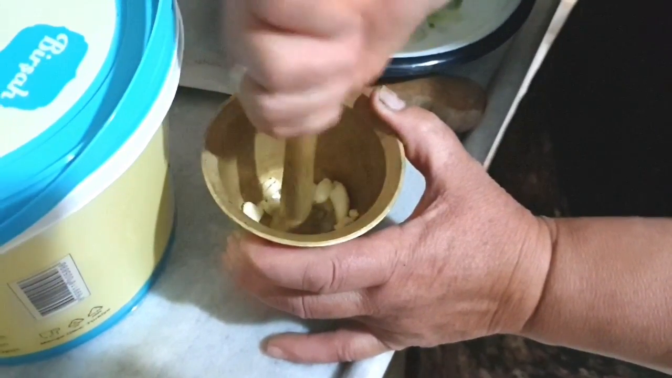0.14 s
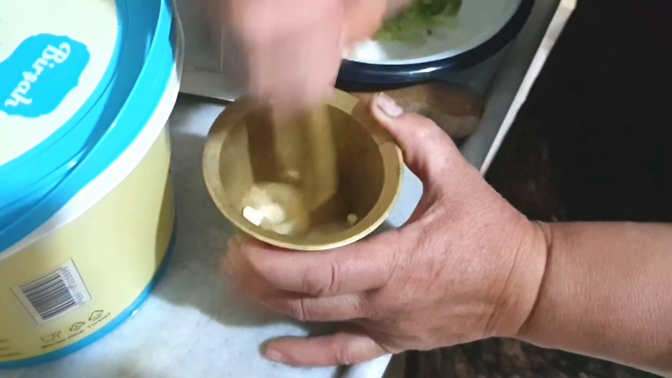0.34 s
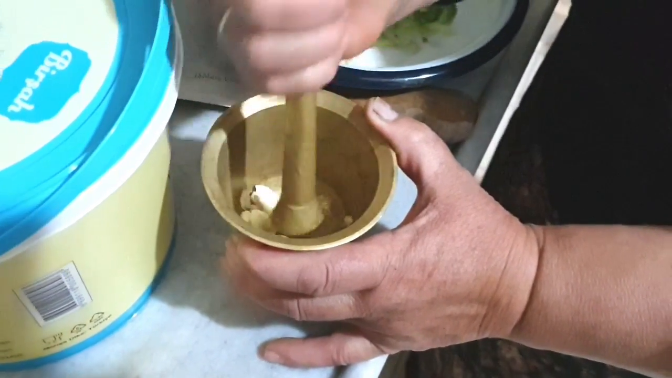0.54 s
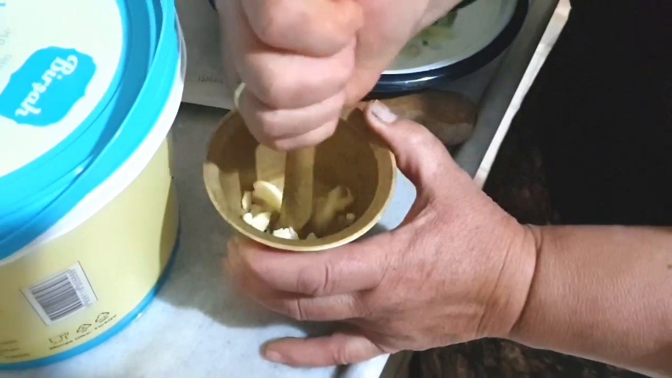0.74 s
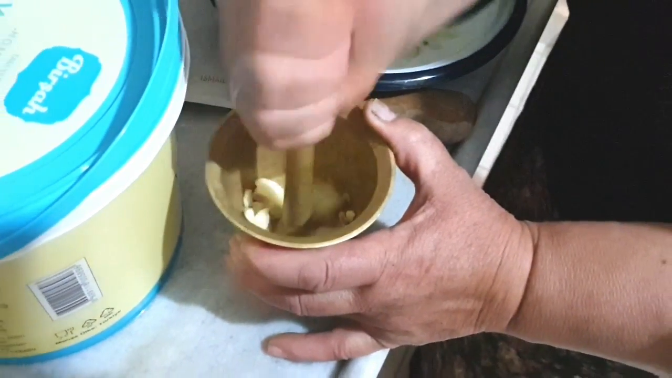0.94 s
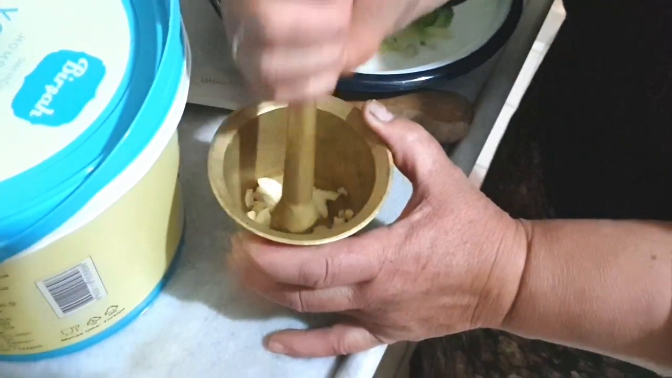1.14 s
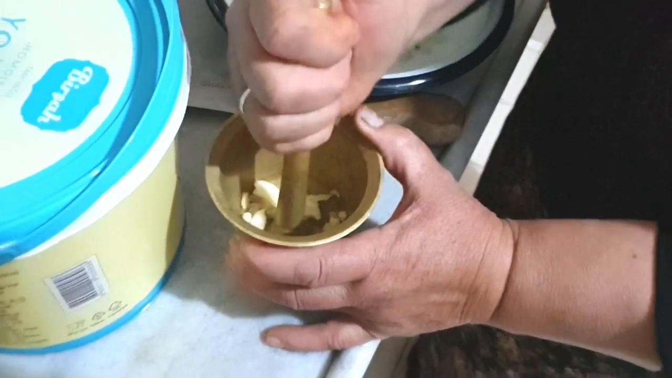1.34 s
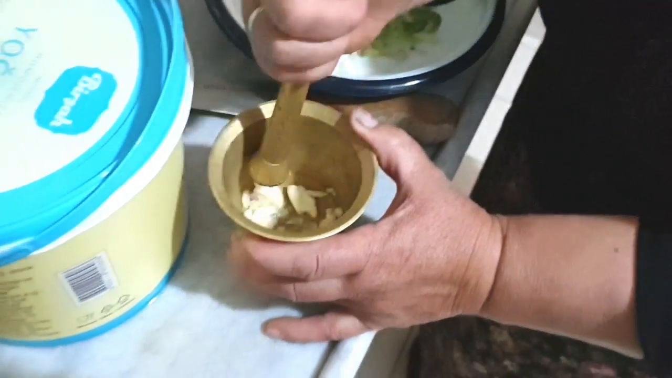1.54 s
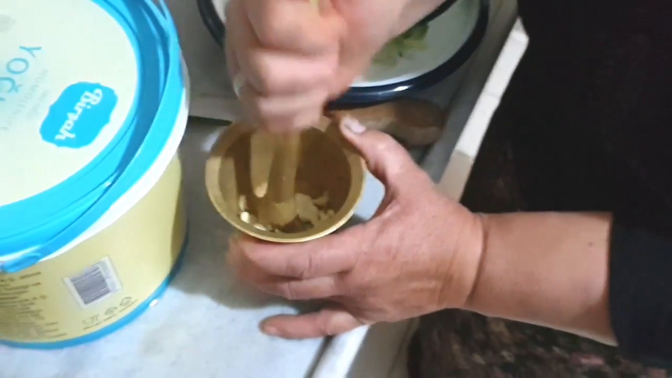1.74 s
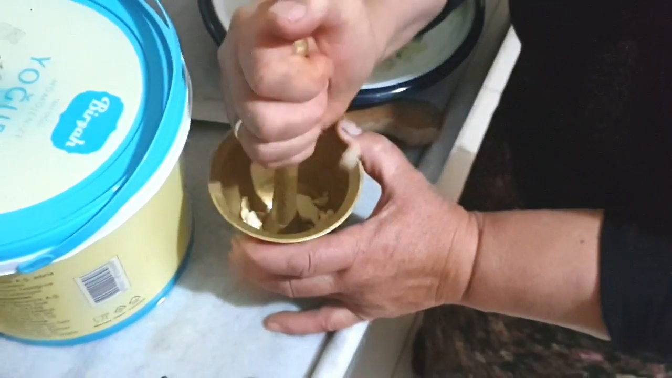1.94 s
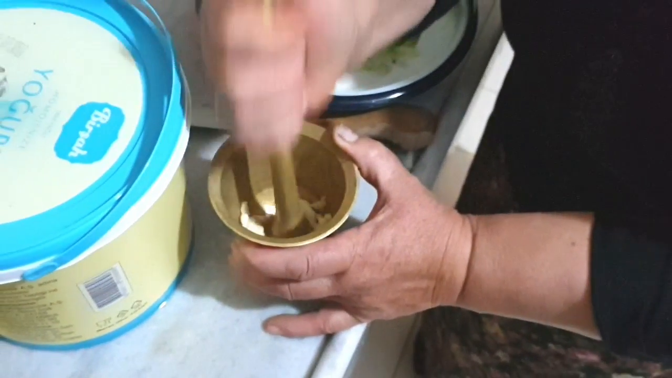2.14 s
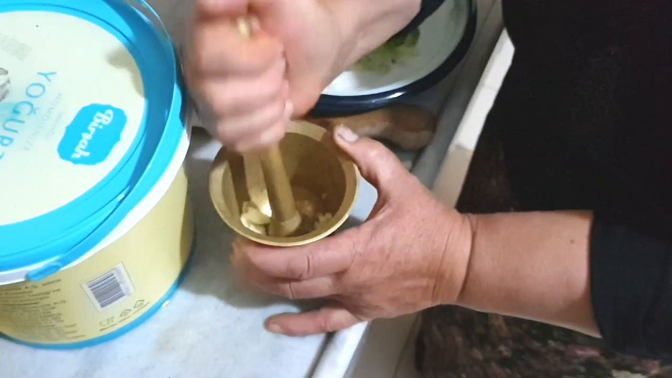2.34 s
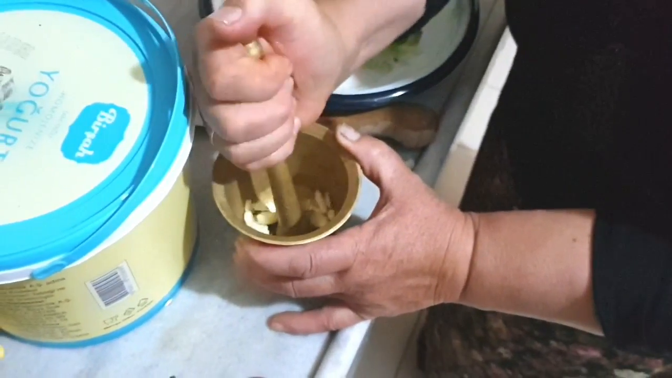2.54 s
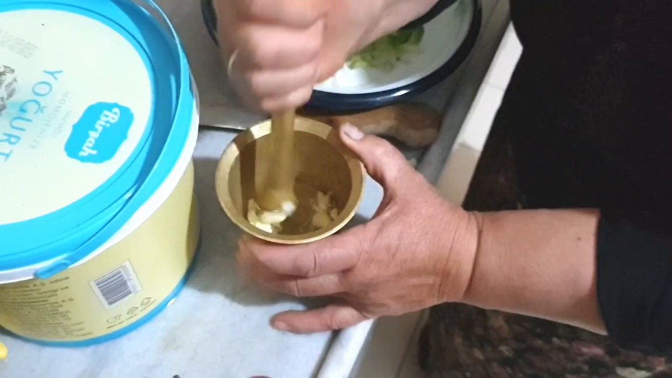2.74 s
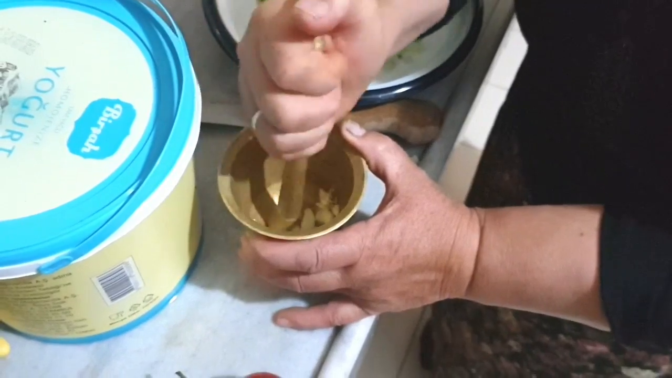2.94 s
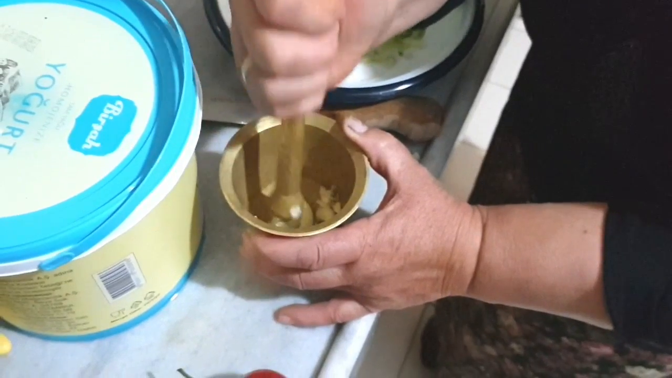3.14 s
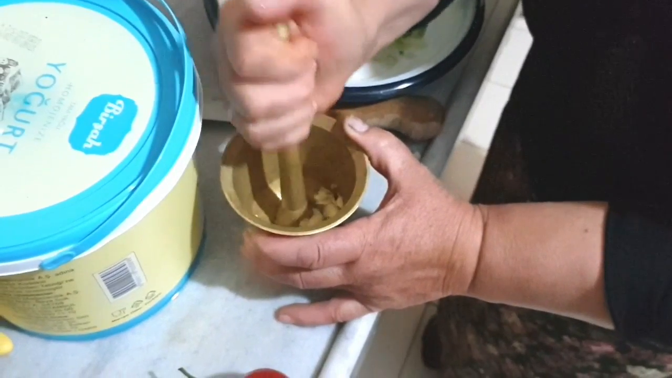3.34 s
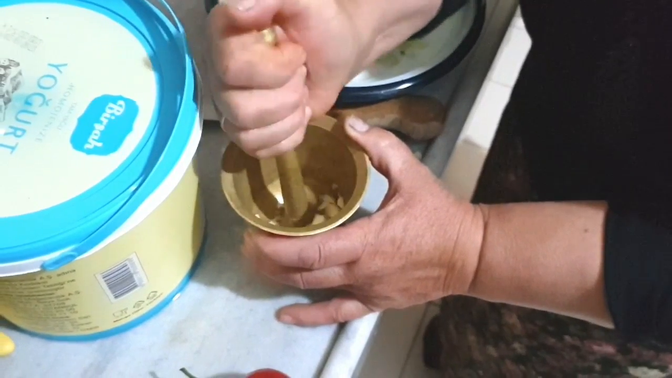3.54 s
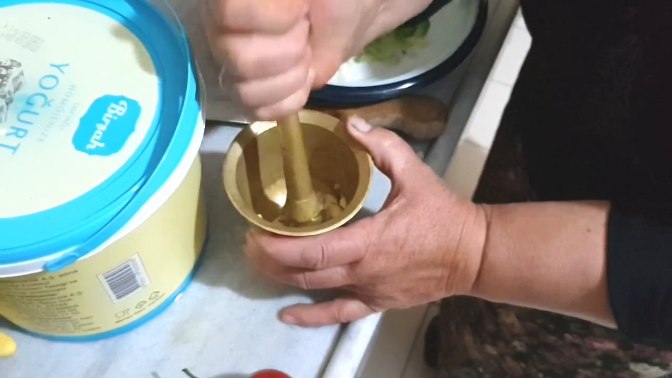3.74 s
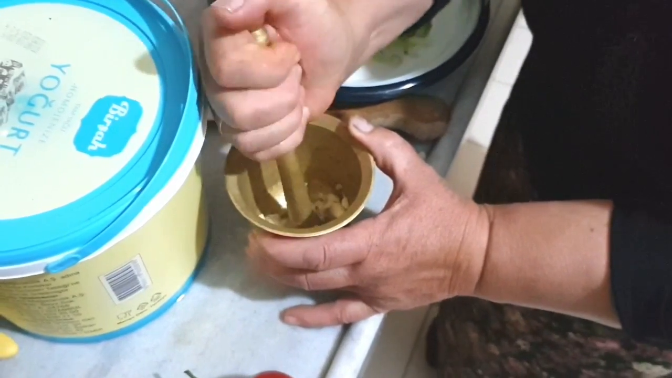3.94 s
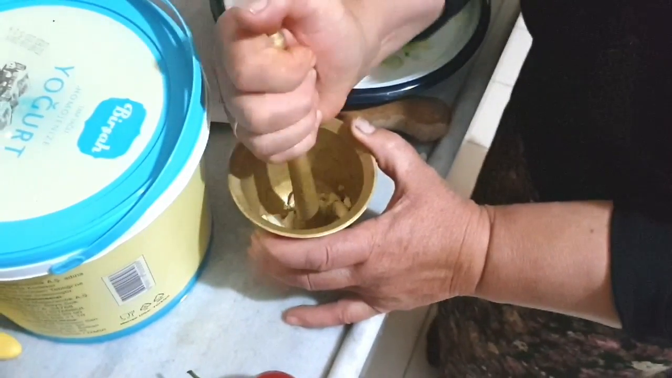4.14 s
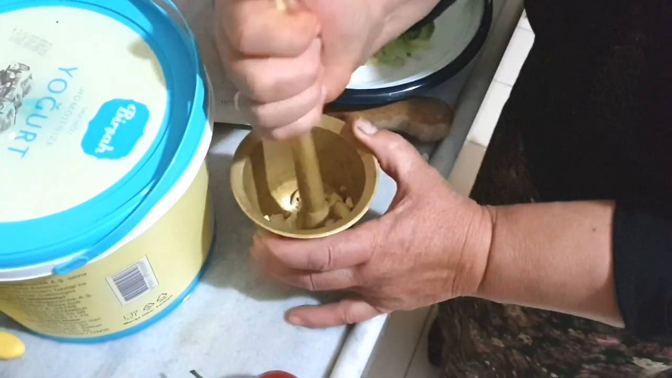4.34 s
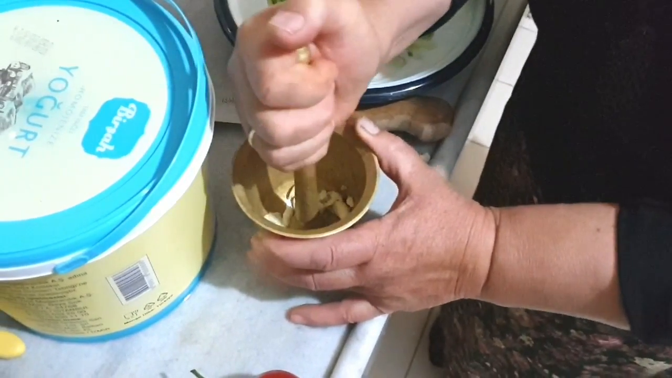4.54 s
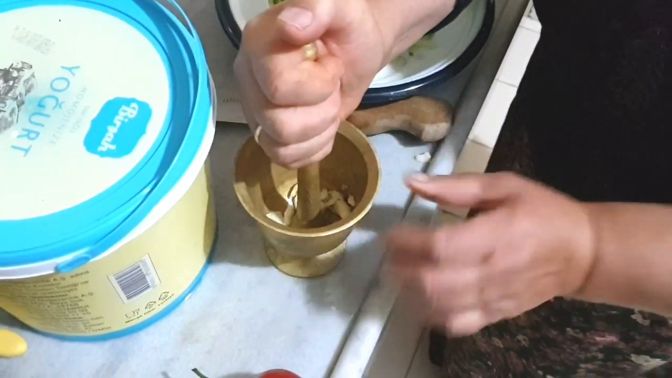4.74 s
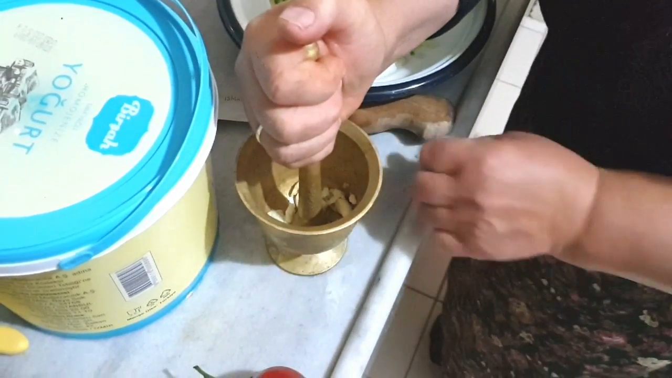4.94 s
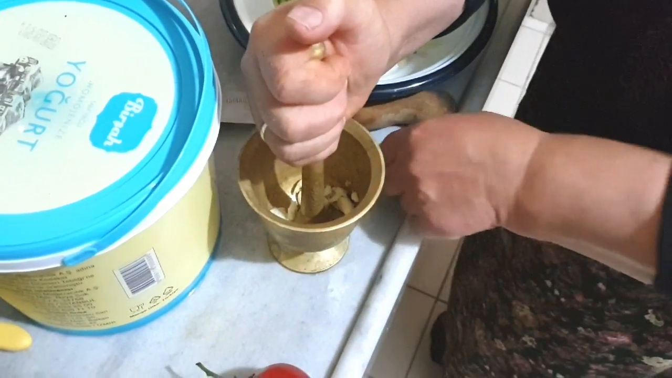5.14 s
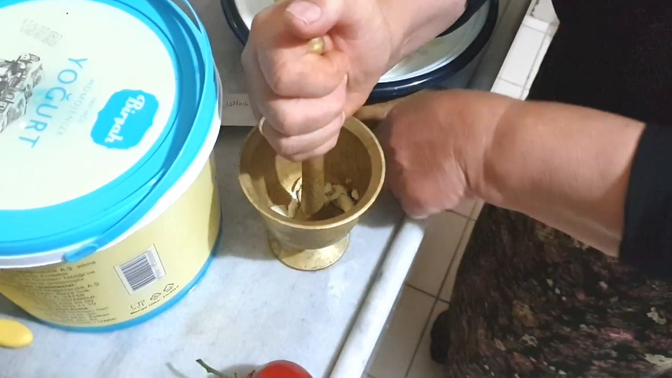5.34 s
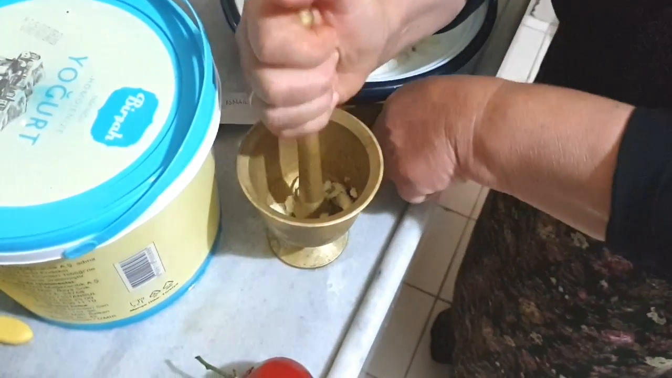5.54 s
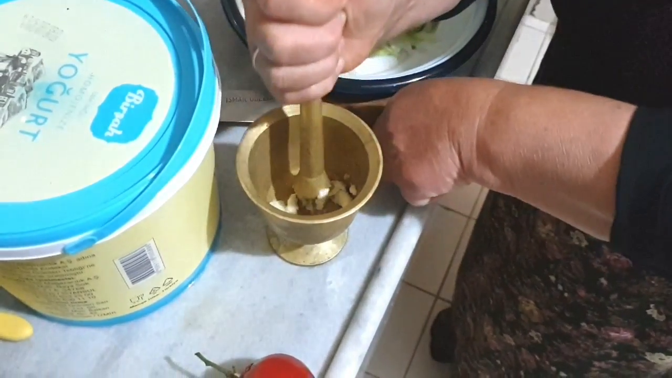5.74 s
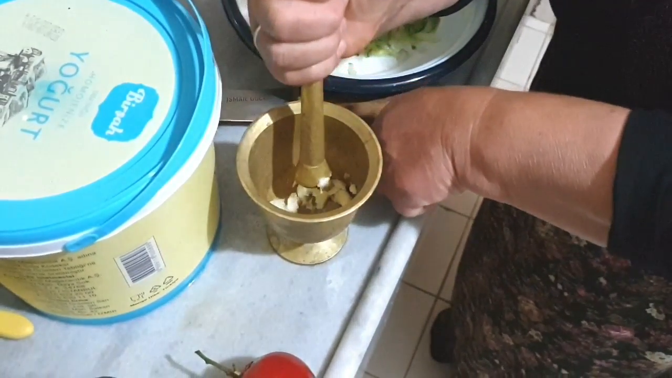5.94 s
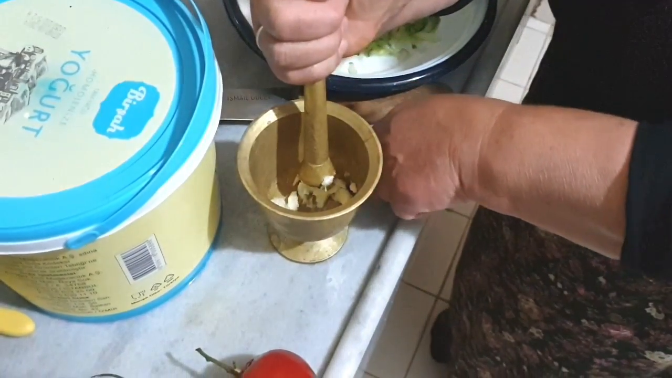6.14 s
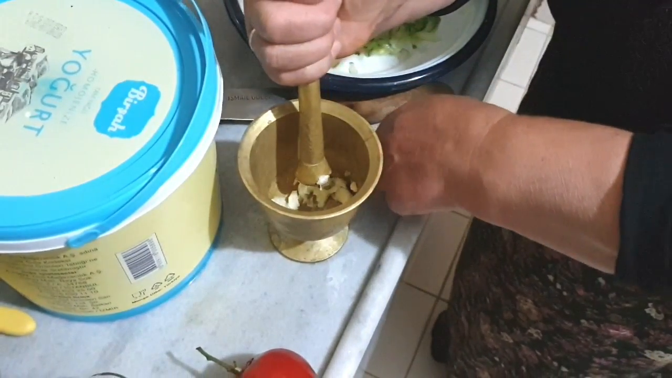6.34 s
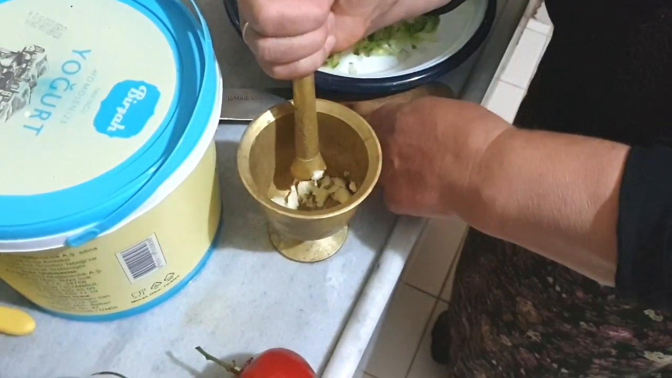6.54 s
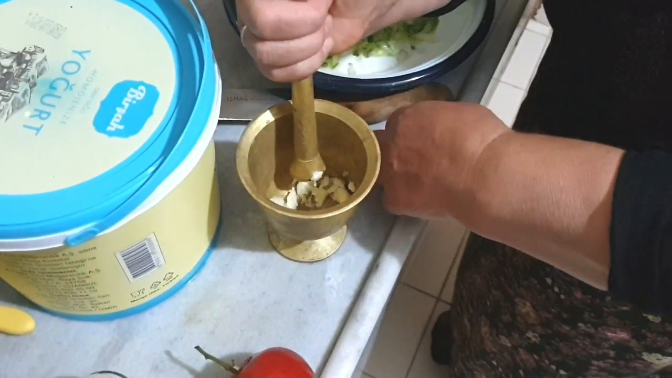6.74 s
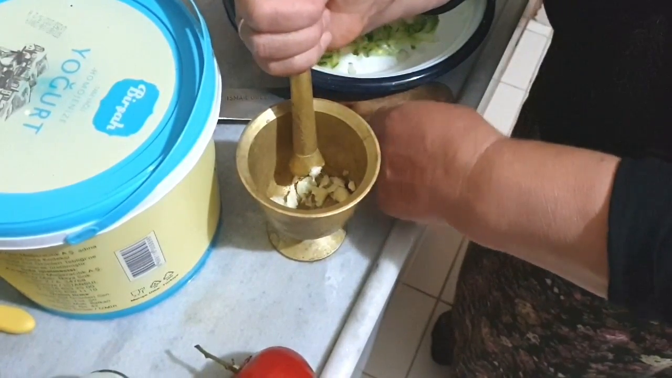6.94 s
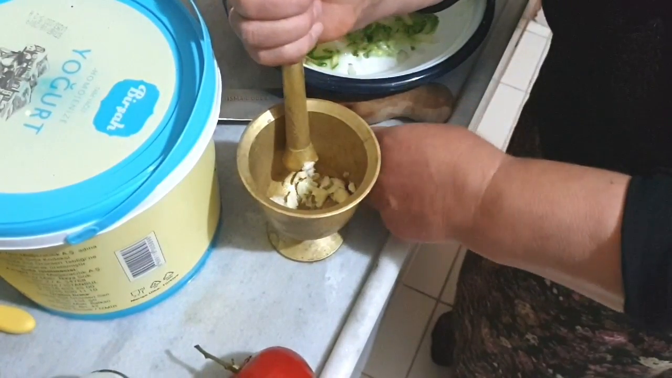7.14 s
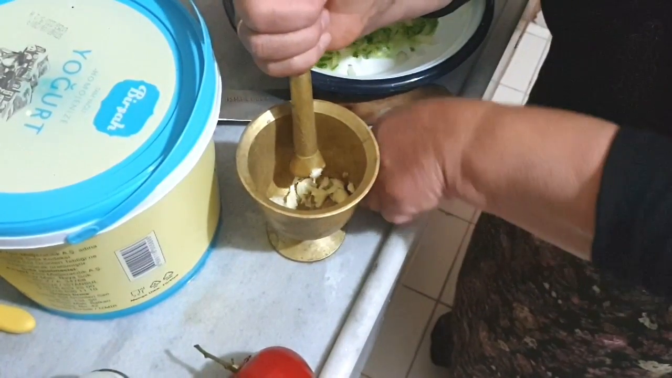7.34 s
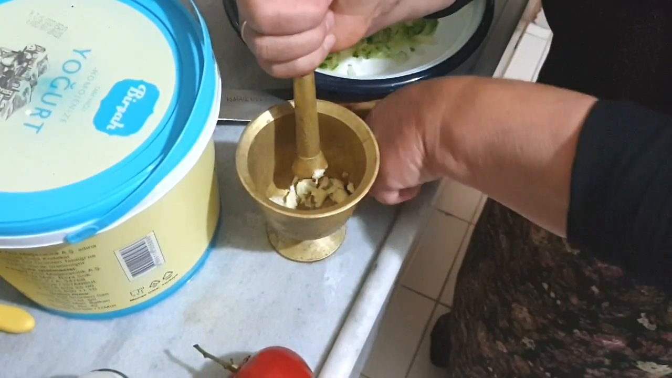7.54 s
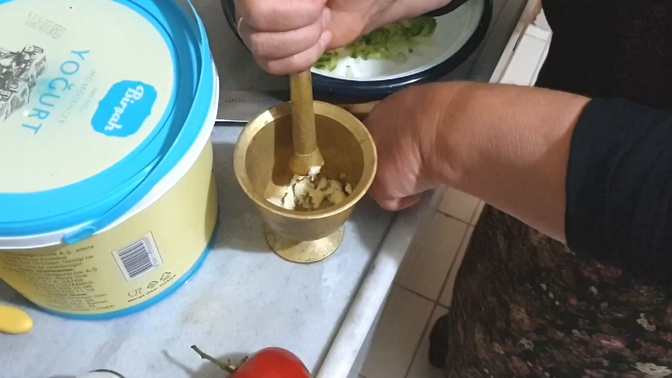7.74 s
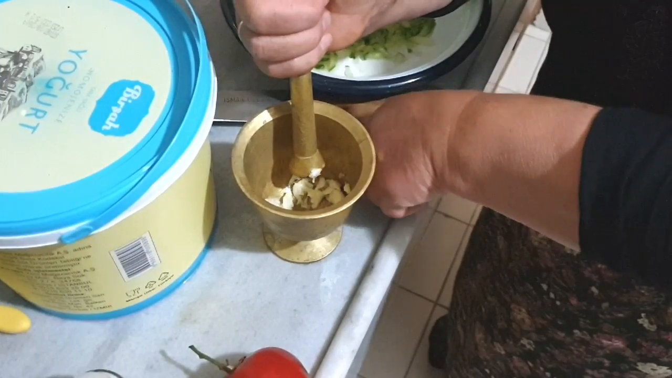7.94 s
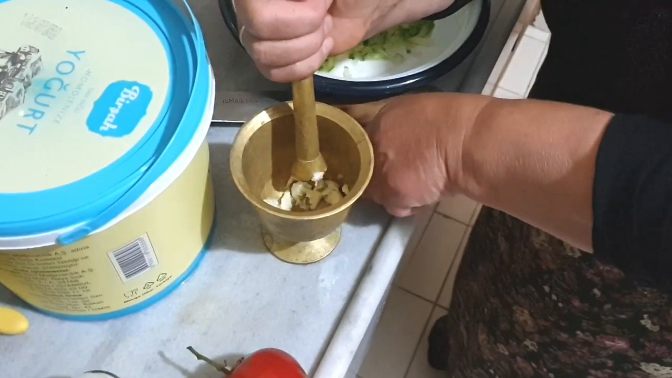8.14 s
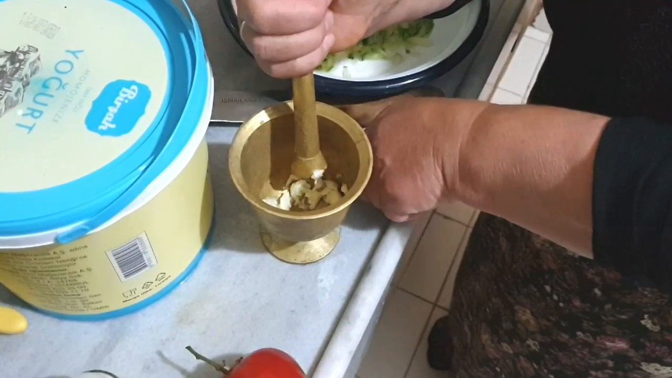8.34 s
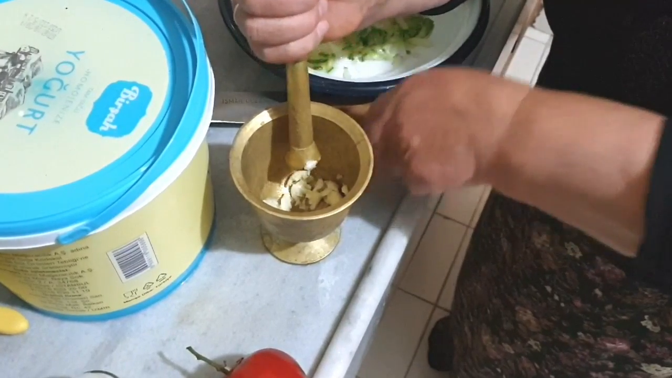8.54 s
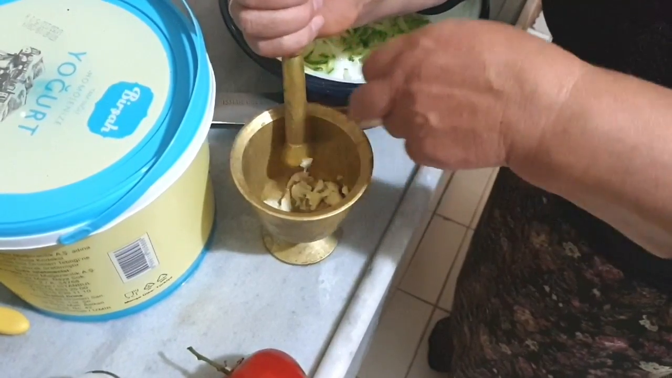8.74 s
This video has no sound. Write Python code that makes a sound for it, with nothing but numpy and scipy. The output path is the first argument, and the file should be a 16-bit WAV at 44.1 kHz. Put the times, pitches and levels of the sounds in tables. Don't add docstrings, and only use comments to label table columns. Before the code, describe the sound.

A close stereo microphone in a small tiled kitchen, with low room hum, hand rumble and slight hiss throughout. From 0.2 s a metal pestle pounds garlic in a brass mortar, a blow roughly every 0.3 s: hard hollow knocks shake the counter and cupboard, with a short metallic ping, small wet crunches and a quick room echo. Bright damped bell clinks from the rim ring out at 0.45, 1.65 and 2.95 s. The hardest blow, at 2.3 s, overloads slightly. Cushioned thuds at 2.0, 3.35, 4.0 and 4.25 s alternate with cracks; the last light, sharp hit is at 4.55 s. Thin plastic crackle, faint earlier, emerges from 3.9 s in short rustles, then grows stronger from 6.4 s, peaking near 6.8 and 8.0 s. Faint soft taps come at 5.3 s and around 7.0-7.4 s, with a tiny tick at 7.2. A light metallic clink ends it at 8.76 s.

```python
import sys
import numpy as np
from scipy import signal
from scipy.fft import rfft, irfft
from scipy.io import wavfile
from scipy.ndimage import uniform_filter1d

SR = 44100
rng = np.random.default_rng(int(sys.argv[2]) if len(sys.argv) > 2 else 0)


def convert_level_to_amplitude(level_db):
    exponent = np.asarray(level_db, float) / 20
    return 10 ** exponent


def file_out(sig):
    cols = np.atleast_2d(sig).T
    lim = np.clip(cols, -1, 1)
    pcm = np.round(lim * 32767).astype(np.int16)
    wavfile.write(sys.argv[1], SR, pcm)


N = 387198

LEAD_S = .00028


def evened(x):
    return x / np.sqrt(np.mean(x ** 2) + 1e-20)


def read(points, hz):
    f, value = np.transpose(points)
    return np.interp(np.log(hz + 1), np.log(f + 1), value)


def add(mix, start_s, sound):
    part = mix[:, round(start_s * SR):][:, :sound.shape[-1]]
    part += sound[..., :part.shape[1]]


def ring(modes, damping, spread_db, turn_rad, rise_s, scatter=0, count=1, slip_rad=0.68, lead_s=0):
    hz, db, t60_s = np.repeat(np.transpose(modes), count, axis=1)[:, :, None]
    t = np.arange(round(SR * min(t60_s.max() / damping, 1 / 3))) / SR
    level_luck, phase_luck, port_luck, pitch_luck = rng.standard_normal((4, len(hz), 1))
    fade = np.exp(-np.log(1000) * t * damping / t60_s)
    size = convert_level_to_amplitude(db + spread_db * level_luck) * fade * (1 - np.exp(-t / rise_s))
    phase = 2 * np.pi * hz * (1 + scatter * pitch_luck) * t + slip_rad * phase_luck
    half_turn = turn_rad * port_luck + np.pi * hz * lead_s
    left = (size * np.sin(phase - half_turn)).sum(0)
    right = (size * np.sin(phase + half_turn)).sum(0)
    return np.array([left, right]) / np.sqrt((convert_level_to_amplitude(db) ** 2).sum())


def burst(lo_hz, hi_hz, rise_s, t60_s):
    t = np.arange(round(SR * min(t60_s + .01, .25))) / SR
    shared = 350 / lo_hz
    noise = rng.standard_normal((2, len(t))) + shared * rng.standard_normal(len(t))
    band = signal.butter(2, [lo_hz, min(hi_hz, SR * .45)], "band", fs=SR, output="sos")
    return evened(signal.sosfilt(band, noise)) * convert_level_to_amplitude(-60 * t / t60_s) * (1 - np.exp(-t / rise_s))


def pair_noise(frames, size, lag_samples):
    # f/Hz, correlation [0-1]
    likeness = [(60, 1), (300, 0.93), (700, 0.73), (1500, 0.27), (3500, 0.14), (8000, 0.28), (15000, 0.033)]
    hz = np.fft.rfftfreq(size, 1 / SR)[:, None]
    a, b, c, d = rng.standard_normal((frames, len(hz), 4), np.float32).T
    same = np.clip(read(likeness, hz), 0, 1)
    right = a + 1j * b
    late = np.exp(-2j * np.pi * hz * lag_samples / SR)
    left = same * right * late + np.sqrt(1 - same ** 2) * (c + 1j * d)
    return hz, np.array([left, right])


def drone(colour, level_db, patchy_db):
    frames = N // 256 + 5
    hz, z = pair_noise(frames, size=1024, lag_samples=2.2)
    patches = uniform_filter1d(rng.standard_normal((frames, len(hz))), 14, 0)
    patches = evened(uniform_filter1d(patches, 3, 1)).T
    z = z * convert_level_to_amplitude(read(colour, hz) + patchy_db * patches)
    plain = evened(signal.istft(z, nperseg=1024, noverlap=768)[1][:, :N])
    return plain * convert_level_to_amplitude(level_db + 3.0)


def stirring():
    # t/s, level/dB
    stir = [(0, -49), (.43, -52), (.7, -61), (1.06, -73), (1.38, -53), (1.65, -52), (1.88, -62), (2.0, -50),
            (2.3, -51), (2.5, -72), (2.78, -66), (2.88, -57), (3.2, -51), (3.55, -57), (4.2, -53),
            (6.25, -54.5), (7.35, -60), (8.78, -46)]
    # start t/s, hold/s, level/dB, time to swell 10 dB/s
    crumples = [(.936, .002, -54, .004), (2.466, .002, -55, .005), (3.2, .05, -50, .03),
                (3.452, .01, -49, .04), (3.8, .035, -47, .04), (3.92, .06, -38.5, .03),
                (4.12, .03, -50, .08), (4.502, .04, -39, .03), (4.62, .05, -49, .03), (4.8, .01, -47, .05),
                (4.93, .03, -52, .06), (5.15, .01, -46, .05), (5.27, .01, -54, .03), (5.62, .01, -51, .04),
                (5.71, .01, -44, .05), (5.88, .03, -47.5, .07), (6.06, .03, -46, .09), (6.3, .08, -47, .04),
                (6.44, .24, -37.5, .09), (6.795, .04, -33, .04), (7.04, .03, -41, .1),
                (7.45, .12, -53, .05), (7.65, .1, -38, .022), (7.81, .1, -38, .06), (8.015, .1, -34.5, .05),
                (8.25, .02, -37, .07), (8.41, .03, -39, .08), (8.58, .04, -41.5, .06),
                (8.73, .05, -38, .06)]
    fall_per_rise = 1.4
    t = np.arange(0, N + 64, 64) / SR
    power = convert_level_to_amplitude(2 * np.interp(t, *np.transpose(stir)))
    for start_s, hold_s, db, swell_s in crumples:
        away_s = np.maximum(start_s - t, 0) + np.maximum(t - start_s - hold_s, 0) / fall_per_rise
        power = power + convert_level_to_amplitude(2 * np.maximum(db - 10 * away_s / swell_s, -120))
    return np.interp(np.arange(N) / SR, t, 10 * np.log10(power))


def hum():
    # f/Hz, density/dB per Hz
    tone_colour = [(76, -27), (130, -3.5), (397, -1), (612, -6.5), (1010, -9), (1460, -13), (1620, -8.5),
                   (3000, -20), (3900, -23.5), (6600, -120)]
    # f/Hz, density/dB per Hz
    rumble_colour = [(25, -35.5), (35, -10.5), (50, -1), (100, 1.5), (150, -5.5), (220, -27.5),
                     (400, -53.5)]
    # f/Hz, density/dB per Hz
    hiss_colour = [(500, -15), (2000, 1), (7300, 4.5), (8300, -4.5), (16000, -7)]
    # t/s, level/dB
    hiss_level = [(0, -60.5), (8.78, -65.5)]
    # t/s, level/dB
    hand = [(0, 10), (.35, -4), (1, 3), (2, -3), (3, 1), (4.6, -1), (5.6, -5), (6.1, -1), (6.6, -2),
            (7.2, 4), (8, 3), (8.78, 3)]
    t = np.arange(N) / SR
    tone_db = -53 + np.interp(t, *np.transpose(hand))
    rumble_db = -55 + .2 * (stirring() + 50)
    hiss_db = np.interp(t, *np.transpose(hiss_level))
    return drone(tone_colour, tone_db, 2.8) + drone(rumble_colour, rumble_db, 2.4) + drone(hiss_colour, hiss_db, .3)


def bag():
    # f/Hz, density/dB per Hz
    bag_colour = [(180, -6), (300, 0), (343, -7.5), (462, -10), (676, -14), (771, -6), (1450, -6.5),
                  (2380, -6), (3910, -2.5), (7100, -8), (8380, -15), (12100, -11), (15700, -20.5)]
    frames = N // 64 + 5
    hz, z = pair_noise(frames, size=256, lag_samples=12.0)
    snaps = uniform_filter1d(rng.exponential(1, frames) ** 2, 3)
    clumps = evened(uniform_filter1d(rng.standard_normal(frames), 14))
    patches = uniform_filter1d(rng.standard_normal((frames, len(hz))), 8, 0)
    patches = evened(uniform_filter1d(patches, 5, 1)).T
    z = z * convert_level_to_amplitude(read(bag_colour, hz) + 0.27 * clumps + 1.2 * patches) * np.sqrt(1 + .08 * snaps)
    plain = evened(signal.istft(z, nperseg=256, noverlap=192)[1][:, :N])
    return plain * convert_level_to_amplitude(stirring() + 8.5)


def boom():
    # f/Hz, level/dB, t60/s
    boom_modes = [(71, 1, .6), (80, -4, .3), (63, -8, .3), (97, 3, .15), (122, 3, .07)]
    return ring(boom_modes, 1, 1.5, .2, .006)


def crowd(start_s, db, parts):
    lead_in_s = .01
    noise_db = -4.5
    out = np.zeros((2, SR // 2))
    for delay_s, hz, part_db, spread, t60_s in parts:
        at_s, level_db = delay_s + lead_in_s, db + part_db
        modes = ring([(hz, 0, t60_s)], 0.84, 0.5, min(hz / 2500, .5), 0.64 / hz, spread, count=9)
        add(out, at_s, convert_level_to_amplitude(level_db) * modes)
        width = 1 + 3 * spread
        add(out, at_s, convert_level_to_amplitude(level_db + noise_db) * burst(hz / width, hz * width, 1.1 / hz, t60_s))
    return start_s - lead_in_s, out


def bumps():
    # t/s, level/dB, pestle ring/dB, weight/dB
    rebounds = [
        (.476, -10, 8.5, 0),
        (1.739, -14, -8, -4),
        (3.12, -17.5, -17, -10),
    ]
    # delay/s, f/Hz, level/dB, spread/f, t60/s
    rebound_ring = [(-.001, 3270, -5, .035, .025)]
    rebound_knock = [(-.002, 2186, -8, .34, .064), (0, 1180, 1, .13, .05)]
    rebound_weight = [(.008, 800, 2.5, .15, .06), (.004, 410, -11, .2, .15)]
    # t/s, level/dB, upper thud/dB, counter boom/dB
    pads = [
        (2.019, -18, -3, -3),
        (3.364, -20, -11, 2),
        (3.975, -28, -15, -11.5),
        (4.272, -21, 0, 1),
    ]
    # delay/s, f/Hz, level/dB, spread/f, t60/s
    pad_low = [(0, 240, 0, .17, .16)]
    pad_high = [(-.0075, 410, 0, .11, .065)]
    # t/s, level/dB, f/Hz,
    # spread/f, t60/s
    taps = [(.01, -33, 76, .08, .4), (.01, -33, 800, .4, .1), (.444, -10, 3250, .04, .08),
            (.444, -24, 7690, .004, .1), (1.663, -21, 3050, .02, .1), (1.736, -24, 3500, .04, .03),
            (3.357, -39, 1130, .02, .07), (4.551, -26, 2100, .2, .1), (8.758, -28, 3300, .05, .03),
            (8.759, -33, 1140, .03, .07), (8.774, -29, 3200, .03, .04), (2.957, -27, 3150, .03, .1),
            (3.657, -28, 3400, .01, .25), (3.658, -34, 2700, .01, .3), (0.444, -24, 118, 0.03, 0.17),
            (1.664, -39, 316, 0.17, 0.6), (1.727, -25, 3270, 0.06, .07), (2.014, -39, 1130, 0.027, 0.04),
            (2.958, -40, 320, 0.1, 0.16), (3.066, -31, 3785, 0.0036, 0.2), (4.774, -41, 302, 0.043, 0.39),
            (5.268, -33.5, 305, 0.12, 0.24), (5.269, -32, 650, .3, 0.16), (5.27, -37, 1200, .25, .05),
            (6.964, -39, 459, 0.064, 0.4), (6.965, -38, 900, .3, .2), (7.186, -35, 312, .015, 0.3),
            (7.382, -40, 457, 0.039, .1), (7.437, -39, 400, 0.057, 0.26), (7.184, -36, 900, .3, .05),
            (7.375, -41, 1500, .3, .12), (7.4, -46, 70, .1, .3), (7.44, -35.5, 1300, 0.35, 0.14)]
    out = np.zeros((2, N))
    for s, db, ring_db, weight_db in rebounds:
        add(out, *crowd(s, db + ring_db, rebound_ring))
        add(out, *crowd(s, db, rebound_knock))
        add(out, *crowd(s, db + weight_db, rebound_weight))
        add(out, s, convert_level_to_amplitude(db + weight_db - 14) * boom())
    for s, db, upper_db, boom_db in pads:
        add(out, *crowd(s, db, pad_low))
        add(out, *crowd(s, db + upper_db, pad_high))
        add(out, s, convert_level_to_amplitude(db + boom_db) * boom())
    for s, db, hz, spread, t60_s in taps:
        add(out, *crowd(s, db, [(0, hz, 0, spread, t60_s)]))
        add(out, s, convert_level_to_amplitude(db - 14) * min(1, 400 / hz) * boom())
    return out


def crushes():
    # t/s, level/dB, centre f/Hz, length/s
    cloves = [(.165, -36, 2000, 0.0073), (.472, -24, 10000, .012), (.768, -23.5, 3400, .005),
              (1.072, -27, 2390, 0.047), (1.409, -30, 2050, .008), (2.003, -17, 7100, .003),
              (2.009, -18.5, 7000, .003), (2.31, -24, 2000, .007), (2.597, -30, 3000, 0.008),
              (3.345, -31.5, 9000, .012), (3.354, -19.5, 9000, .004), (3.646, -26, 6000, .005),
              (3.966, -32.5, 7940, .005), (4.256, -21, 8150, .006), (4.262, -11, 8000, .003),
              (4.264, -21, 6340, 0.013)]
    out = np.zeros((2, N))
    for s, db, hz, length_s in cloves:
        add(out, s, convert_level_to_amplitude(db) * burst(hz * 0.42, hz * 1.4, length_s * 0.1, length_s * 3))
    return out


def blows():
    # t/s, knock/dB, then relative to it thud/dB, pestle ring/dB, crack/dB
    hits = [
        (.170, 1.5, -11, -9.5, -22),
        (.773, -1, -11, -1, -14.5),
        (1.097, 2, -10, -0.5, -15.5),
        (1.416, -3.5, -10.5, -9, -16.5),
        (2.317, 3, -8, -6.5, -15.5),
        (2.608, 1.5, -9.5, -6, -22),
        (3.064, -8.5, -16, -3.5, -17.5),
        (3.655, -1, -9, -10, -14.5),
        (4.55, -8, -10.5, -4, -12),
    ]
    # f/Hz, level/dB, t60/s
    thud_modes = [(179, -10.5, 0.19), (239.5, 0.5, 0.25), (309, 3, .22), (366.6, -1, 0.12), (403, -1, 0.28),
                  (461.6, -9, 0.34), (534, -4, 0.13), (582.4, 3, 0.14), (501, -6, 0.15)]
    knock_modes = [(678, 4, .12), (740, 5, .12), (770, 10.5, .14), (850, 3, .1), (925, 8, .1),
                   (1068, 7, .1), (1142, 6, .1), (1290, -4, .08), (1404, 5, .1), (1500, 0, .08),
                   (1602, 3, .12), (1800, -3, .08), (2150, -4, .07), (2430, -5, .07)]
    # f/Hz, level/dB, t60/s
    pestle_modes = [(3360, 0, .025), (3330, -21, .1), (3140, -9, .035), (3480, -11, .035), (3780, -15, .09),
                    (4300, -13, .025)]
    out = np.zeros((2, N))
    for s, knock_db, thud_rel_db, pestle_rel_db, crack_rel_db in hits:
        thud_db, pestle_db = knock_db + thud_rel_db, knock_db + pestle_rel_db
        thud = ring(thud_modes, 1.2, 1.6, 0.13, 0.0023, .006, count=2)
        add(out, s, convert_level_to_amplitude(thud_db + .6) * thud)
        add(out, s, convert_level_to_amplitude(thud_db - 5.5) * burst(200, 700, .003, 0.22))
        knock = ring(knock_modes, 1.7, 2, .5, 0.0004, 0.008, count=2, lead_s=LEAD_S)
        add(out, s, convert_level_to_amplitude(knock_db - 9.5) * knock)
        add(out, s, convert_level_to_amplitude(knock_db - 6.5) * burst(450, 1450, .0008, 0.12))
        add(out, s, convert_level_to_amplitude(knock_db - 12) * burst(220, 1900, .002, 0.18))
        add(out, s, convert_level_to_amplitude(knock_db - 17) * burst(1400, 2900, .0004, 0.09))
        pestle = ring(pestle_modes, 1.1, 1, 0.3, 0.00013, .003, slip_rad=.25, lead_s=LEAD_S)
        add(out, s, convert_level_to_amplitude(pestle_db + .3) * pestle)
        add(out, s, convert_level_to_amplitude(pestle_db - 12) * burst(3000, 3650, .0003, 0.06))
        add(out, s, convert_level_to_amplitude(knock_db + crack_rel_db + 2) * burst(3200, 13000, .0002, 0.02))
        add(out, s, convert_level_to_amplitude(thud_db - 11) * boom())
    return out


def clinks():
    # t/s, then first, second, third and high bowl modes/dB
    grazes = [
        (0.4433, -20, 2.5, -13.5, -18.5),
        (1.6622, -23, -15, -6.5, -17.5),
        (1.684, -29, -16, -30, -25.5),
        (1.726, -32, -26, -32, -33),
        (2.9562, -26, -16.5, -12, -20),
        (3.015, -33, -27, -36, -35),
        (7.226, -65, -54, -60, -43.5),
        (8.759, -27.5, -18.5, -48, -36),
    ]
    # f/Hz, level/dB, t60/s
    bowl_1 = [(1404, 0, .2), (1418, -4, .18), (1378, -9, .12)]
    bowl_2 = [(3768, 0, .22), (3783, -4, .15), (3797, -9, .14), (3818, -14, .12), (2990, -14, .07),
              (3180, -11, .07), (3290, -10, .06)]
    bowl_3 = [(6878, 0, .09), (6896, -16, .13), (6840, -10, .08), (7668, -20, .1), (6121, -24, .1),
              (4900, -11, .025)]
    bowl_high = [(8795, 0, .1), (10375, -2, .1), (10762, -3, .05), (11560, -9, .06), (13410, -4, .06),
                 (14660, -10, .04), (15450, -12, .03)]
    grip_db, loosen_per_db = -21, .03
    toward_rim = convert_level_to_amplitude([[1.5], [-1.5]])
    out = np.zeros((2, N))
    for s, *family_db in grazes:
        high_db = family_db[3]
        damping = np.clip(1 + loosen_per_db * (high_db - grip_db), .2, 1)
        for modes, db in zip((bowl_1, bowl_2, bowl_3, bowl_high), family_db):
            add(out, s, convert_level_to_amplitude(db) * ring(modes, damping, 1, .45, .0002, slip_rad=0) * toward_rim)
        add(out, s, convert_level_to_amplitude(high_db + 6.5) * burst(4000, 13000, 0.00014, 0.011))
        add(out, s, convert_level_to_amplitude(np.mean(family_db) - 4) * burst(1200, 5500, .0003, 0.16))
    return out


def kitchen(x):
    # f/Hz, t60/s
    decay = [(60, 1), (160, 0.13), (420, 0.38), (1100, 0.35), (2910, 0.33), (7680, 0.29)]
    # f/Hz, level/dB
    echo_colour = [(90, -19.5), (200, -4), (1000, 3), (3300, -3.5), (4500, -1), (7300, 1.5), (8300, -3),
                   (15000, 6)]
    frames = SR // 64
    hz, z = pair_noise(frames, size=256, lag_samples=-10.5)
    t = np.arange(frames) * 64 / SR
    z = z * convert_level_to_amplitude(read(echo_colour, hz) - 60 * t / read(decay, hz))
    tail = signal.istft(z, nperseg=256, noverlap=192)[1]
    tail = tail * (1 - np.exp(-np.arange(tail.shape[1]) / SR / 0.0069))
    tail = tail / np.linalg.norm(tail[0])
    return signal.fftconvolve(x.mean(0)[None], tail, axes=1)[:, :N]


def scene():
    dull = blows() + bumps() + crushes()
    bright = clinks()
    echo = kitchen(convert_level_to_amplitude(-3.5) * dull + convert_level_to_amplitude(-13) * bright)
    return dull + bright + echo + bag() + hum()


def top_cut(x):
    return signal.sosfilt(signal.butter(12, 15880, fs=SR, output="sos"), x)


def record(dry):
    # f/Hz, left over right/dB
    lean = [(60, 0.5), (110, 5.5), (200, 0.5), (380, 1.5), (700, 2.0), (1290, 1.5), (2380, 1.0), (4400, 3),
            (8120, 6), (15000, -2)]
    hz = np.fft.rfftfreq(N, 1 / SR)
    half_lean_db = read(lean, hz) / 2
    bass_cut = hz ** 2 / (hz ** 2 + 28.5 ** 2)
    port_gain = convert_level_to_amplitude(np.array([half_lean_db, -half_lean_db]))
    ports = irfft(rfft(dry) * bass_cut * port_gain, N)
    return top_cut(np.clip(ports, -1, 1))


dry = scene()
out = record(dry)
file_out(out)
```